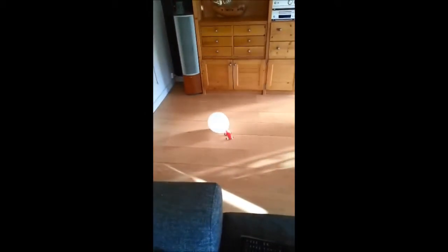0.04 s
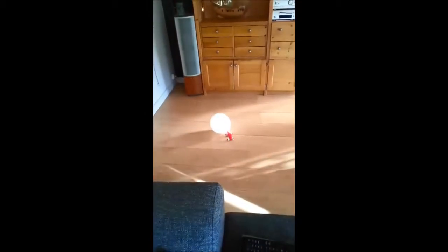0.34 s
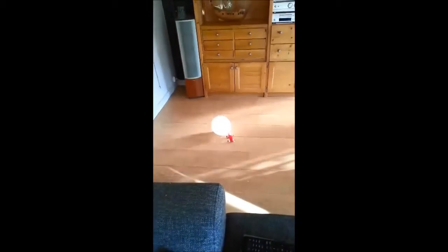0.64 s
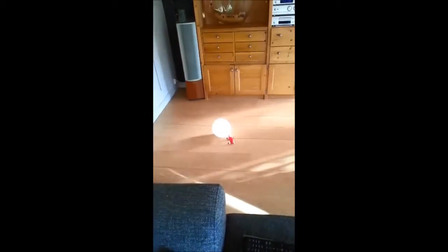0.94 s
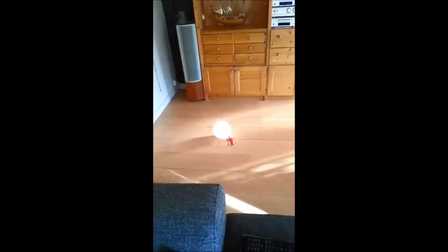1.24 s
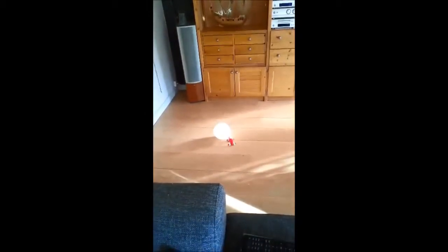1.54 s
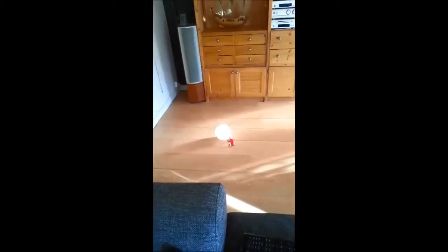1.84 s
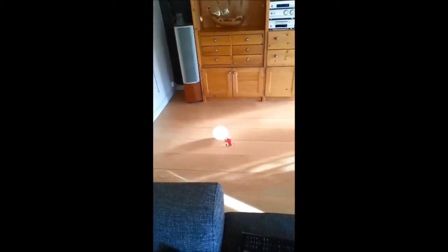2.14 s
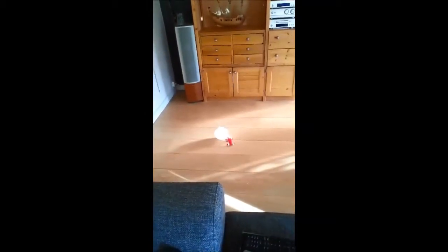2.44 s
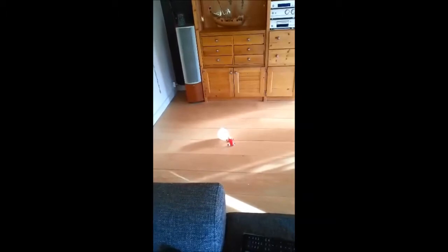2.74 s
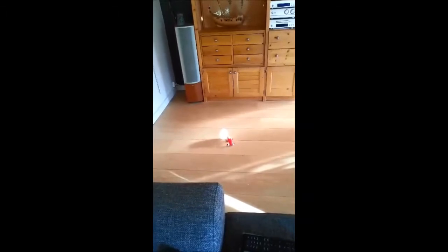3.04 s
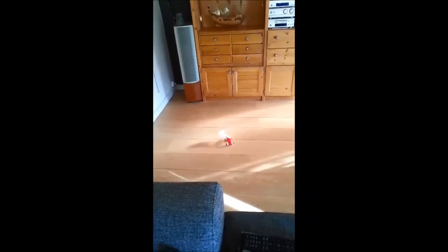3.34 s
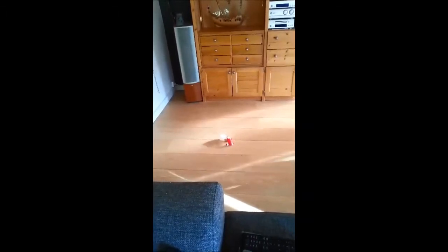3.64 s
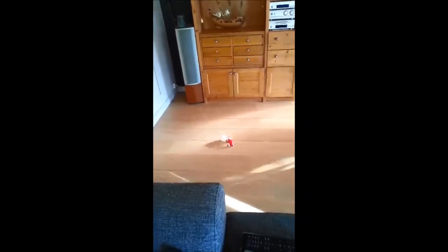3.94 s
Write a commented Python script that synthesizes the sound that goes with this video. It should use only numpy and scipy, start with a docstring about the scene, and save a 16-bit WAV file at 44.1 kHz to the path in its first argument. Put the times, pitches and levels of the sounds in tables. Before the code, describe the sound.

Air hisses out of a balloon on a toy car, brightening until it runs out.

```python
"""In a quiet living room, a few metres away, a balloon empties through a toy car on the wooden floor.
The jet of air hisses and makes the car's nozzle ring. As the balloon shrinks, the sound grows louder
and brighter, then ends in a hollow last rush, and the limp rubber rustles faintly.
A few soft bumps sound halfway and after the air runs out. The room adds echoes and a faint hush."""
import sys
import numpy as np
from scipy import signal
from scipy.fft import rfft, irfft
from scipy.io import wavfile
from scipy.ndimage import uniform_filter1d

SR = 44100
rng = np.random.default_rng(int(sys.argv[2]) if len(sys.argv) > 2 else 0)


def unload_audio(sound):
    """Save the sound as a 16-bit wav file, at the path given as the first command line argument."""
    columns = np.transpose(np.atleast_2d(sound))
    # keep every value between -1 and 1, then stretch to whole-number steps
    steps = np.round(np.clip(columns, -1, 1) * 32767)
    wavfile.write(sys.argv[1], SR, steps.astype(np.int16))


N = 176400
T = np.arange(N) / SR
HZ = np.maximum(np.arange(N // 2 + 1) * SR / N, 1)


# how strongly the air flows out: t/s, level/dB
AIR_FLOW = [(0, -38.5), (.25, -39.5), (.5, -39), (.9, -39.3), (1.4, -39), (1.8, -38), (2.05, -35.5),
            (2.45, -36.5), (2.85, -36.5), (3.12, -38), (3.37, -35.5), (3.43, -39.5), (3.47, -64),
            (3.52, -66), (3.58, -58), (3.63, -81)]
def balloon(flutter_db=.5):
    """All the sounds of the escaping air, rising and falling together with its flow."""
    air = jet() + fizz() + nozzle() + slack_balloon()
    flow = undb(curve(AIR_FLOW) + flutter_db * wobble(per_second=45))
    gliding_bands = hollow_core() + climbing_ring() + neck_whistle()
    return flow * (air + gliding_bands)


# tone colour of the hiss: f/Hz, level/dB
JET_COLOUR = [(60, -52), (125, -20.5), (190, -19.5), (280, -12), (550, -9.5), (1000, -6), (1300, -6),
              (2050, -3), (2700, -4.5), (3150, -5), (3650, 0.6), (4550, 0), (5050, -3), (5900, -2),
              (6700, -7.5), (8400, -13.5), (9400, -13), (10400, -19), (11500, -17.8), (14400, -34.5)]
# how far the hiss leans towards the treble: t/s, tilt/dB per octave
JET_TILT = [(0, -0.85), (1.5, -0.03), (2.2, 0.17), (2.7, 1.05), (3.1, 0), (3.45, 0)]
def jet(pivot_hz=2920):
    """Swirling air hisses, brightening as the balloon shrinks and easing back near the end."""
    hiss = noise(undb(over_hz(JET_COLOUR)))
    tilt = curve(JET_TILT)
    return sum(band * undb(tilt * np.log2(hz / pivot_hz)) for hz, band in octaves(hiss))


# strength of the fizz next to the jet: t/s, level/dB
FIZZ_LEVEL = [(0, -49), (1.8, -36), (2.7, -19.5), (3.3, -14), (3.6, -17)]
def fizz(hz=10900, width_hz=2710):
    """The jet's fine, very high fizz grows as the balloon empties."""
    return noise(resonances([(hz, width_hz, 0)])) * undb(curve(FIZZ_LEVEL))


# pitches at which the nozzle rings: f/Hz, width/Hz, level/dB
NOZZLE_PITCHES = [(547, 70, -5.5), (767, 70, -.5), (1476, 67, -6), (1890, 100, 4.5), (2310, 100, 0.5),
                  (3700, 440, -4.5), (5620, 260, 1)]
# their strength next to the jet: t/s, level/dB
NOZZLE_LEVEL = [(0, -12), (.5, -7.5), (1.8, -9), (2.1, -11.5), (2.42, -7), (2.8, -9.5), (3.1, -16),
                (3.35, -9)]
def nozzle():
    """Air from the stretched balloon makes the nozzle ring."""
    return noise(resonances(NOZZLE_PITCHES)) * undb(curve(NOZZLE_LEVEL))


# pitches at which the nearly empty balloon rings: f/Hz, width/Hz, level/dB
SLACK_PITCHES = [(1174, 110, -7), (1500, 97, 0), (1930, 280, 2.5), (2520, 84, 0.5), (2846, 170, 3),
                 (4880, 240, -2.5), (6040, 130, -6)]
# their strength next to the jet: t/s, level/dB
SLACK_LEVEL = [(0, -37), (3.1, -11), (3.27, -5.5), (3.42, -2.5), (3.47, 4), (3.52, -16)]
def slack_balloon():
    """The last rush of air rings hollowly in the nearly empty balloon."""
    return noise(resonances(SLACK_PITCHES)) * undb(curve(SLACK_LEVEL))


# pitch of the core and its strength next to the jet: t/s, f/Hz, level/dB
CORE_PATH = [(0, 1983, -15), (.4, 1980, -7), (1.2, 2000, -9), (1.8, 2060, -5), (2.1, 2050, -10.5),
             (2.46, 2030, -5), (2.53, 2086, 0), (2.585, 2104, -11), (2.645, 2075, 0), (2.695, 2090, -10),
             (2.75, 2102, -1.5), (2.81, 2085, -9), (2.865, 2110, 0.5), (2.92, 2115, -7.5), (3.08, 2120, -5),
             (3.3, 2100, -13)]
def hollow_core():
    """The hollow middle of the hiss rises a little, throbs as the balloon gets small, then fades."""
    return gliding(CORE_PATH, width_hz=425)


# pitch of the broad ring and its strength next to the jet: t/s, f/Hz, level/dB
CLIMB_PATH = [(0, 3700, -15), (.7, 3800, -22), (1.1, 3850, -4), (1.5, 3944, -11), (1.8, 4250, -8.5),
              (2.1, 4273, -12), (2.4, 4000, -4.5), (2.58, 4237, -4), (2.85, 4433, -5.5), (3.1, 4670, -7.5),
              (3.3, 4750, -15)]
def climbing_ring():
    """A broad ring climbs as the balloon shrinks and fades as its neck goes slack."""
    return gliding(CLIMB_PATH, width_hz=880)


# pitch of the whistle and its strength next to the jet: t/s, f/Hz, level/dB
WHISTLE_PATH = [(3.12, 3920, -40), (3.24, 3960, -8), (3.35, 4000, -13), (3.42, 4020, -0.5),
                (3.49, 4086, -6), (3.55, 3970, -5), (3.58, 4100, -30)]
def neck_whistle():
    """The slack neck gives a breathy whistle as the last air leaves."""
    return gliding(WHISTLE_PATH, width_hz=250)


# when each bump starts, its strength and its rise time: t/s, level/dB, rise/s
BUMP_HITS = [(1.98, -47, 0.0078), (2.007, -33.5, 0.0019), (2.055, -42, .005), (3.554, -53, 0.012),
             (3.576, -52.5, 0.011), (3.612, -57, .008), (3.644, -61, 0.004)]
# tone colour of a bump: f/Hz, level/dB
BUMP_COLOUR = [(60, -46), (130, -26), (260, -4.5), (400, -4.5), (700, -7), (1300, -12.5), (4000, -43),
               (14000, -47)]
def bumps(decay_s=0.0083):
    """Short, dull thuds that swell quickly and die away without ringing."""
    loudness = 0
    for start, db, rise_s in BUMP_HITS:
        age = np.maximum(T - start, 0)
        rise = np.minimum(age / rise_s, 1)
        fall = np.exp(-np.maximum(age - rise_s, 0) / decay_s)
        loudness = loudness + undb(db) * rise * fall
    return loudness * noise(undb(over_hz(BUMP_COLOUR)))


# when each rustle peaks, how long and how strong it is: t/s, length/s, level/dB
RUSTLE_SWELLS = [(3.717, 0.07, -61.5), (3.899, .04, -64)]
# tone colour of rubbing rubber: f/Hz, width/Hz, level/dB
RUBBER_COLOUR = [(2390, 2200, 4), (4660, 200, 10), (6650, 1700, 1.5), (10900, 3500, -11)]
def rustles():
    """The empty balloon sinks and rubs softly on itself."""
    rub = sum(undb(db) * np.exp(-(2 * (T - at) / length) ** 2) for at, length, db in RUSTLE_SWELLS)
    return rub * noise(resonances(RUBBER_COLOUR))


def room(sound, steps=24, direct_db=-9, changing_share=0.87):
    """The sound plus its echoes, which keep changing because the car and the listener move."""
    lead = SR // 2  # the air is already flowing at the start
    running = np.concatenate([sound[lead:0:-1], sound])
    steady = signal.fftconvolve(running[None], echoes(), axes=1)
    hop = len(running) // steps
    fade = np.sin(np.pi * np.arange(2 * hop) / (2 * hop))
    changing = np.zeros((2, len(running) + SR))
    for start in hop * np.arange(steps - 1):  # each overlapping piece gets its own echoes
        piece = running[start:start + 2 * hop] * fade
        echoed = signal.fftconvolve(piece[None], echoes(), axes=1)
        changing[:, start:start + echoed.shape[1]] += echoed
    changing = np.sqrt(changing_share) * changing[:, lead:lead + N]
    steady = np.sqrt(1 - changing_share) * steady[:, lead:lead + N]
    return undb(direct_db) * sound + changing + steady


def echoes(size=19200, early_db=-6, early_decay_s=0.016, split_hz=6400, low_s=0.46, high_s=0.49):
    """The room's answer to a click: quick first echoes, then a tail whose highs last a bit longer."""
    t = T[:size]
    early = all_around(1, size) * np.exp(-t / early_decay_s)
    late = all_around(1, size)
    low = irfft(rfft(late) / (1 + (bins(size) / split_hz) ** 2), size)
    high = late - low
    tail = low * undb(-60 * t / low_s) + high * undb(-60 * t / high_s)
    return even_out(undb(early_db) * unit(early) + unit(tail)) / np.sqrt(size)


def even_out(pair, fine_hz=70, broad_hz=1500):
    """Flatten narrow peaks in the echoes: a furnished room has no hooting notes."""
    size = pair.shape[1]
    spectra = rfft([pair[0] + pair[1], pair[0] - pair[1]]) / 2
    power = abs(spectra) ** 2
    fine, broad = (uniform_filter1d(power, int(hz * size / SR)) for hz in (fine_hz, broad_hz))
    fade_out = np.minimum(np.linspace(2, 0, size), 1) ** 2
    mid, side = irfft(spectra * np.sqrt(broad / fine), size) * fade_out
    return np.array([mid + side, mid - side])


# how alike left and right sound in the room: f/Hz, likeness (1 = the same, 0 = unrelated)
EAR_LIKENESS = [(60, -0.04), (150, -0.34), (280, 0.61), (500, 1), (1000, 0.21), (3000, 0.034),
                (14000, -0.13)]
def all_around(gain, size=N):
    """Noise arriving from all sides, most alike in both ears near 500 Hz."""
    likeness = np.clip(over_hz(EAR_LIKENESS, bins(size)), -.95, .95)
    mid, side = rfft(rng.standard_normal((2, size))) * gain * np.sqrt([1 + likeness, 1 - likeness])
    return unit(irfft([mid + side, mid - side], size))


# tone colour of the room's background: f/Hz, level/dB
HUSH_COLOUR = [(25, 11), (55, -42), (90, -5), (130, 6.5), (350, 2), (700, 1.5), (1500, -2), (3500, -6),
               (6300, 0.5), (8000, -5.5), (14000, -6)]
def room_hush(level_db=-61):
    """The faint, steady noise of the quiet room."""
    return undb(level_db) * all_around(undb(over_hz(HUSH_COLOUR)))


def undb(db):
    """Turn decibels into a factor to multiply by."""
    return 10 ** (np.asarray(db) / 20)


def unit(x):
    """Scale a sound to an average strength (rms) of 1."""
    return x / np.sqrt(np.mean(x ** 2))


def curve(rows, column=1):
    """Join one column of (t/s, value, ...) rows with straight lines."""
    columns = np.array(rows, float).T
    return np.interp(T, columns[0], columns[column])


def over_hz(rows, hz=HZ):
    """Join (f/Hz, value) rows, giving each octave equal room."""
    freqs, values = np.array(rows).T
    return np.interp(np.log(hz), np.log(freqs), values)


def bins(size):
    """The frequencies that make up a sound this many samples long."""
    return np.maximum(np.arange(size // 2 + 1) * SR / size, 1)


def noise(gain):
    """Noise of strength 1, coloured by a gain for each frequency."""
    return unit(irfft(rfft(rng.standard_normal(N)) * gain, N))


def resonances(rows):
    """A gain with one steep-sided peak for each (f/Hz, width/Hz, level/dB) row."""
    power = 0
    for hz, width, db in rows:
        off_pitch = (HZ ** 2 - hz ** 2) / (2 * HZ * width)
        power = power + undb(db) ** 2 / (1 + 2 * off_pitch ** 2) ** 2
    return np.sqrt(power)


def gliding(rows, width_hz):
    """A band of airy noise whose pitch and strength follow (t/s, f/Hz, level/dB) rows."""
    white = rng.standard_normal(N) + 1j * rng.standard_normal(N)
    slow = np.fft.ifft(np.fft.fft(white) / (1 + (2 * np.fft.fftfreq(N, 1 / SR) / width_hz) ** 2))
    tone = np.exp(2j * np.pi * np.cumsum(curve(rows)) / SR)  # lifts the slow noise up to the pitch
    return unit((slow * tone).real) * undb(curve(rows, column=2))


def octaves(x):
    """Split a sound into overlapping octaves that add up to the whole: (f/Hz, band) pairs."""
    centres = 62.5 * 2. ** np.arange(9)
    spectrum = rfft(x)
    shares = [np.interp(np.log(HZ), np.log(centres), centres == hz) for hz in centres]
    return [(hz, irfft(spectrum * share, N)) for hz, share in zip(centres, shares)]


def wobble(per_second):
    """Random steps, smoothed twice into a gentle wavering."""
    hold = int(SR / per_second)
    steps = rng.standard_normal(N)[np.arange(N) // hold]
    return unit(uniform_filter1d(uniform_filter1d(steps, hold), hold))


def scene():
    """The distant balloon and the nearer bumps in the room, over its faint hush."""
    toy = balloon() + rustles()
    thuds = bumps()
    hush = room_hush()
    near_thuds = undb(-6) * thuds  # extra direct sound brings the bumps closer
    return room(toy + undb(-3.5) * thuds) + near_thuds + hush


def record(dry, top_hz=14550):
    """Cut off the very highest treble."""
    return signal.sosfilt(signal.ellip(12, .1, 80, top_hz, fs=SR, output="sos"), dry)


dry = scene()
out = record(dry)
unload_audio(out)
```